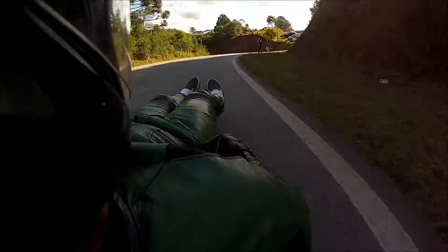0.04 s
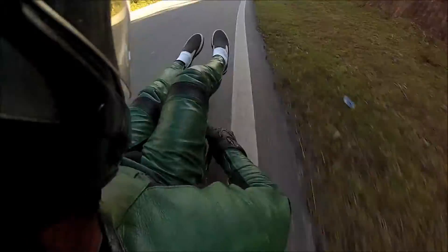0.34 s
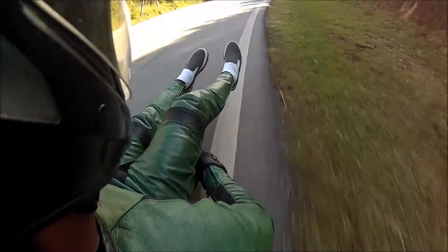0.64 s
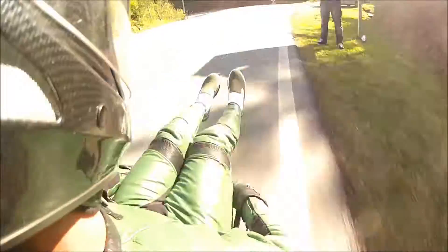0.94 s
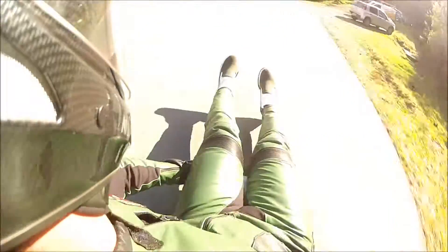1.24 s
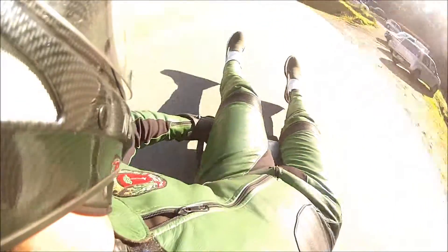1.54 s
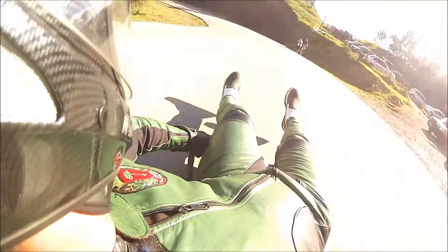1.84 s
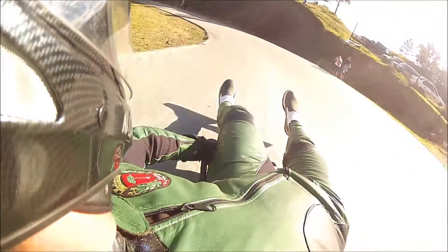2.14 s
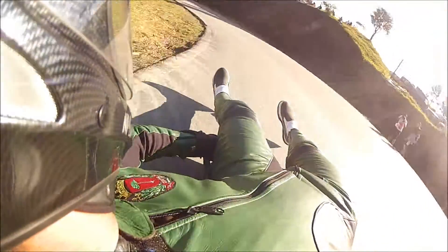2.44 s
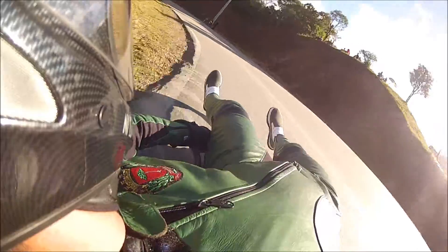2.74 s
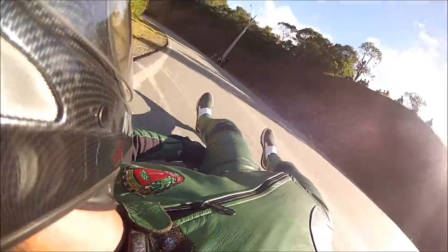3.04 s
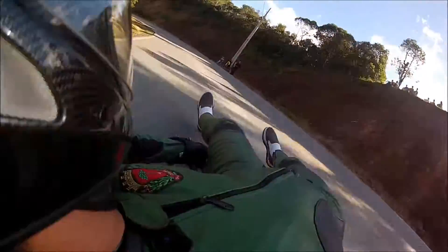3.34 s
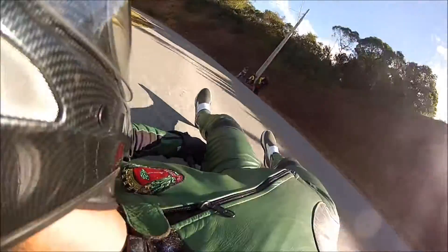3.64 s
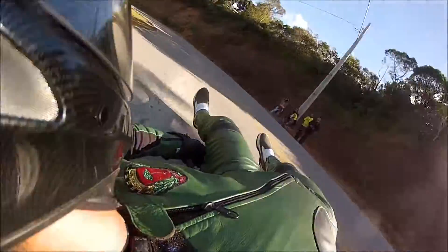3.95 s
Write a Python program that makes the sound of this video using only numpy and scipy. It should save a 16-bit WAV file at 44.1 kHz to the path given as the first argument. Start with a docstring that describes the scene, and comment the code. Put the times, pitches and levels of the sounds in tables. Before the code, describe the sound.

Street luge wheels roar steadily on an asphalt road, with a gritty hiss that surges as they slide through bends. Deep wind buffets the microphone on the rider's helmet, easing early and building again toward the end.

```python
"""The wheels of a street luge roar on asphalt, heard by a cased camera on the rider's helmet.
Countless tiny contacts with the road excite broadband noise; when the sled is steered hard through
a bend, stick-slip friction adds a gritty hiss, and now and then a loose grain cracks under a wheel.
Turbulent wind buffets the helmet and booms in a resonant hollow. The resonances of the camera case
colour the noise, and at moments the level dips briefly, mostly in the treble."""
import sys
import numpy as np
from scipy.fft import rfft, irfft, next_fast_len
from scipy.io import wavfile
from scipy.ndimage import map_coordinates

SR = 44100
rng = np.random.default_rng(int(sys.argv[2]) if len(sys.argv) > 2 else 0)


def log_audio(samples):
    """Write samples as a 16-bit WAV file to the path given in sys.argv[1]."""
    # one column per channel
    frames = np.atleast_2d(samples).T
    # limit to full scale, then quantise
    limited = np.clip(frames, -1, 1)
    pcm = np.round(limited * 32767).astype(np.int16)
    wavfile.write(sys.argv[1], SR, pcm)


N = 176400
TIME = np.arange(N) / SR

# Envelopes (t/s, level/dB)
ROLL_LEVEL = [(0, -24), (.3, -26.5), (.55, -28.5), (1.2, -29.5), (1.8, -28.5), (2.4, -27.5), (4, -26.5)]  # rolling roar
SCRUB_LEVEL = [(0, -24.5), (.12, -22), (.18, -17.5), (.23, -24.5), (.37, -37), (.7, -45), (1.03, -32.5),
               (1.125, -20.5), (1.245, -20), (1.265, -28.5), (1.45, -27), (1.63, -35.5), (1.82, -32),
               (1.865, -19.5), (2.06, -19), (2.19, -22), (2.27, -16), (2.3, -24), (2.68, -21),
               (2.79, -22.5), (2.845, -18), (2.94, -23.5), (3.045, -17), (3.1, -22), (4, -22.5)]  # sideways sliding of the wheels
BUFFET_LEVEL = [(0, -25), (.24, -26), (.38, -36), (.68, -40.5), (.82, -33.5), (1.04, -28.5), (1.14, -38),
                (1.5, -33.5), (1.95, -30), (2.65, -33.5), (2.83, -24.5), (3.1, -25.5), (3.5, -28),
                (4, -29.5)]  # deep buffeting
WIND_LEVEL = [(0, -32), (.25, -24), (.37, -34), (.74, -34.5), (.87, -31.5), (1.1, -40), (1.55, -35),
              (2.08, -35.5), (2.19, -29), (2.3, -35.5), (2.43, -24), (2.54, -32.5), (2.95, -31),
              (3.2, -25.5), (3.48, -24.5), (3.6, -28.5), (3.85, -24), (4, -26.5)]  # rumble and boom of the helmet
AIR_LEVEL = [(0, -42), (.28, -32), (.5, -40.5), (.72, -45.5), (1.1, -35), (1.22, -51), (1.37, -33),
             (1.75, -42), (2.05, -57), (2.23, -32), (2.35, -37), (3.3, -42.5), (4, -35.5)]  # air rushing past the rider
# Spectra of the noise sources (f/Hz, relative level/dB)
ROLL_SPECTRUM = [(60, -13), (280, -3), (480, -8), (820, -7.5), (1080, 1), (1500, -3.5), (1900, 2),
                 (2400, -5.5), (3000, -21), (3700, -14.5), (4500, -23.5), (6200, -25.5), (8800, -28.5),
                 (10400, -15.5), (13800, -15.5), (15200, -38)]
SCRUB_SPECTRUM = [(200, -14), (800, -15.5), (1500, -17.5), (2050, 0), (2380, 0), (2850, -10), (3400, -11),
                  (4300, -18.5), (7600, -24), (9300, -16.5), (10600, -25), (14300, -23.5), (15300, -20.5)]
BUFFET_SPECTRUM = [(8, -25), (22, -15), (37, 9), (62, -5), (110, -10.5), (250, -37), (800, -74)]
RUMBLE_SPECTRUM = [(30, -6), (70, -4.5), (110, -1), (145, 2), (220, -9), (400, -19.5), (1200, -34)]
AIR_SPECTRUM = [(100, -20), (200, -2.5), (300, -1.5), (480, -6), (700, -6), (1200, -12), (4000, -48)]
# Single eddies striking the helmet (t/s, level/dB)
EDDY_THUMPS = [(.325, -24), (.475, -23), (1.56, -20), (2.191, -22)]
# Loose grains under a wheel (t/s, level/dB)
GRIT_IMPACTS = [(1.979, -15), (3.059, -13), (3.941, -7)]
# Peaks and notches of the camera case (f/Hz, half width/Hz, gain/dB)
CASE_RESONANCES = [(657, 64, 3.5), (1255, 83, 4), (1744, 50, 2.5), (2687, 51, 5.5), (3091, 110, 8),
                   (3820, 70, 5.5), (5130, 226, 3.5), (5975, 510, -11), (6900, 100, 5), (8200, 74, 6.5),
                   (8890, 99, 6.5), (9820, 296, 8), (12030, 995, -21), (14400, 370, 8.5)]
# Brief dips in level (t/s, half duration/s, treble gain/dB, middle gain/dB)
LEVEL_DIPS = [(.329, .007, -18, -1), (1.183, .007, -10, -1.5), (1.268, 0.0044, -18, 3),
              (1.812, .013, -29, -1), (2.099, 0.0057, -13, -6), (2.14, 0.0041, -2, 3),
              (2.868, 0.0098, -13.5, -1), (2.911, 0.0081, -8, -2), (3.076, 0.0077, -9, 0),
              (3.309, .005, -6, -3)]


def amp(db):
    """Amplitude ratio of a level in decibels."""
    return 10 ** (np.asarray(db) / 20)


def unit(x):
    """Normalisation to rms 1."""
    return x / np.sqrt(np.mean(x ** 2) + 1e-20)


def curve(rows):
    """Linear interpolation of (t/s, value) points at every sample."""
    return np.interp(TIME, *np.transpose(rows))


def wobble(knots_per_s):
    """Smooth random modulation: a spline through Gaussian values."""
    return map_coordinates(rng.standard_normal(N // 8), [TIME * knots_per_s + 2], mode="wrap")


def filtered(x, response):
    """Linear filtering: the spectrum is multiplied by a frequency response."""
    size = next_fast_len(N + SR // 2)
    return irfft(rfft(x, size) * response(np.fft.rfftfreq(size, 1 / SR)), size)[:N]


def through_case(x, spectrum):
    """Filters in cascade: source spectrum and case resonances add in decibels. The result has rms 1."""
    def response(hz):
        points_hz, points_db = np.transpose(spectrum)
        source_db = np.interp(np.log(hz + 1), np.log(points_hz), points_db)
        case_db = sum(db * np.exp(-((hz - f) / width) ** 2) for f, width, db in CASE_RESONANCES)
        return amp(source_db + case_db)
    return unit(filtered(x, response))


def road_texture(grain_share, grains_per_s=3000, spread_db=2):
    """Shot noise: random contacts with the asphalt carry a share of the power, smooth hiss the rest."""
    contacts = (rng.random(N) < grains_per_s / SR) * np.sign(rng.standard_normal(N))
    grains = contacts * amp(spread_db * np.clip(rng.standard_normal(N), -2, 2))
    return np.sqrt(grain_share) * unit(grains) + np.sqrt(1 - grain_share) * rng.standard_normal(N)


def rolling(flutter_db=0.8):
    """Roughness excitation: the road's texture shakes the wheels into a steady roar."""
    envelope = amp(curve(ROLL_LEVEL) + flutter_db * wobble(30.25))
    return envelope * through_case(road_texture(grain_share=.35), ROLL_SPECTRUM)


def scrubbing(judder_db=1.28, chatter_db=0.97):
    """Stick-slip friction: sliding wheels grip unevenly, which modulates their hiss."""
    slips = road_texture(grain_share=.43) * amp(chatter_db * wobble(500))
    envelope = amp(curve(SCRUB_LEVEL) + judder_db * wobble(45))
    return envelope * through_case(slips, SCRUB_SPECTRUM)


def turbulence(spectrum, level_db):
    """Turbulent flow: random pressure fluctuations make a broad band of noise."""
    return through_case(rng.standard_normal(N), spectrum) * amp(level_db)


def helmet_boom(f_hz=92, bandwidth_hz=6.3):
    """Cavity resonance: a hollow of the helmet, driven by noise, responds in a narrow band."""
    def resonator(hz):
        damping = 1j * hz * bandwidth_hz
        return damping / (f_hz ** 2 - hz ** 2 + damping)
    return unit(filtered(rng.standard_normal(N), resonator))


def wind(lumps_db=-0.1, flutter_db=0.6, swirl_db=1.1):
    """Flow noise: deep buffeting, a rumble and boom that swell together, and air rushing past."""
    buffet = turbulence(BUFFET_SPECTRUM, curve(BUFFET_LEVEL) + lumps_db * wobble(12))
    rumble = turbulence(RUMBLE_SPECTRUM, -3 + flutter_db * wobble(35))
    boom = amp(-1.5) * helmet_boom()
    air = turbulence(AIR_SPECTRUM, curve(AIR_LEVEL) + swirl_db * wobble(25.12))
    return buffet + amp(curve(WIND_LEVEL)) * (rumble + boom) + air


def eddies(f_hz=60.5, half_duration_s=.021):
    """Vortex impact: each eddy thumps the helmet with a short, soft swing of pressure."""
    thumps = np.zeros(N)
    for centre_s, db in EDDY_THUMPS:
        t = TIME - centre_s
        envelope = amp(db) * np.exp(-(t / half_duration_s) ** 2)
        thumps += envelope * np.cos(2 * np.pi * (f_hz * t + rng.random()))
    return thumps


def grit(ring_hz=2350, decay_s=.002):
    """Impact excitation: a loose grain cracks under a wheel, which rings as a damped oscillator."""
    crack = amp(-11) * through_case(rng.standard_normal(N), SCRUB_SPECTRUM)
    clicks = np.zeros(N)
    for onset_s, db in GRIT_IMPACTS:
        t = TIME - onset_s
        envelope = amp(db) * (t >= 0) * np.exp(-np.abs(t) / decay_s)
        clicks += envelope * (np.sin(2 * np.pi * ring_hz * t) + crack)
    return clicks


def scene():
    """Superposition: the pressures from wheels and wind add at the helmet."""
    wheels = rolling() + scrubbing() + grit()
    return (wheels + wind() + eddies())[None]


def record(dry, middle_hz=179, treble_hz=2840, top_hz=15400):
    """Amplitude modulation by band: brief dips, mostly in the treble, then a sharp low-pass."""
    def above(edge_hz):
        return filtered(dry[0], lambda hz: 1 - 1 / (1 + (hz / edge_hz) ** 10))
    treble = above(treble_hz)
    middle = above(middle_hz) - treble
    treble_db, middle_db = sum(np.outer(gains_db, np.exp(-((TIME - centre_s) / half_s) ** 4))
                               for centre_s, half_s, *gains_db in LEVEL_DIPS)
    dipped = dry[0] + (amp(treble_db) - 1) * treble + (amp(middle_db) - 1) * middle
    return filtered(dipped, lambda hz: hz < top_hz)[None]


dry = scene()
out = record(dry)
log_audio(out)
```